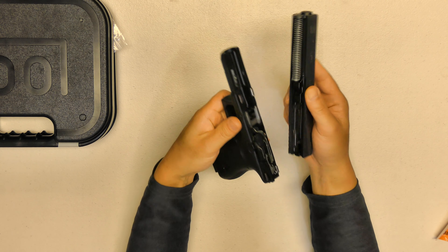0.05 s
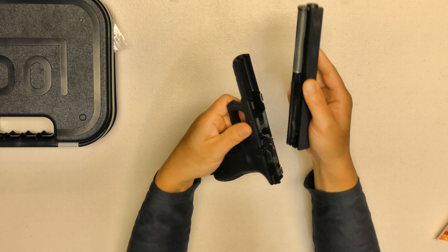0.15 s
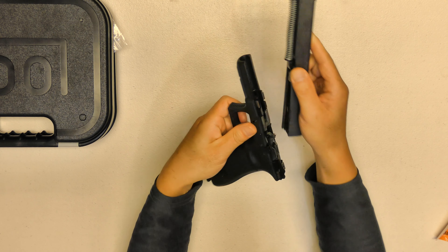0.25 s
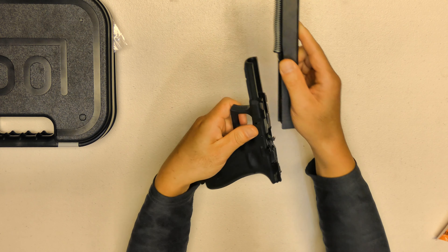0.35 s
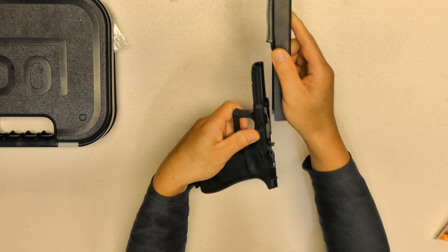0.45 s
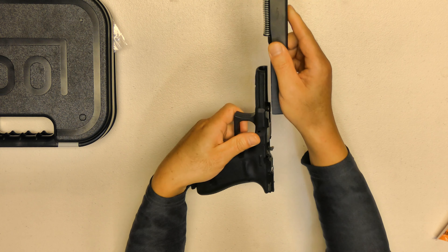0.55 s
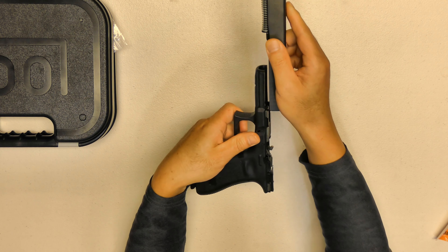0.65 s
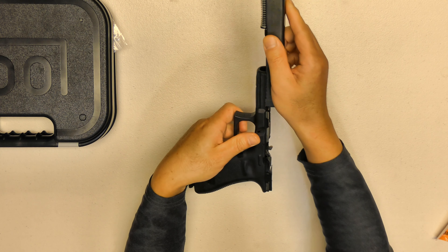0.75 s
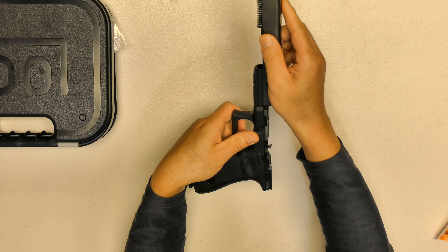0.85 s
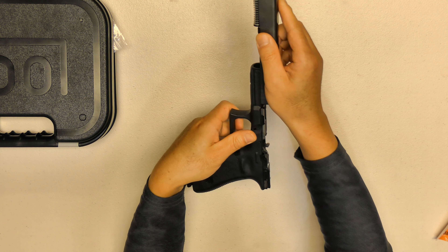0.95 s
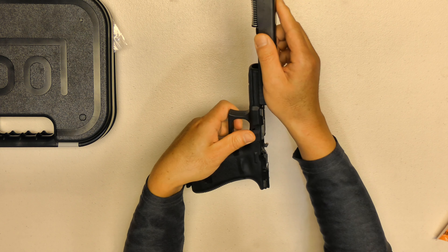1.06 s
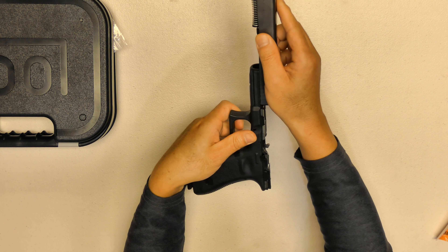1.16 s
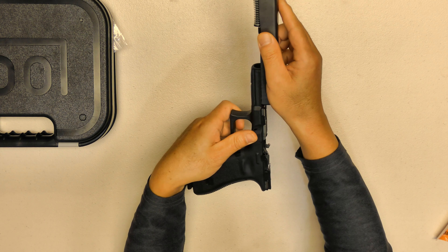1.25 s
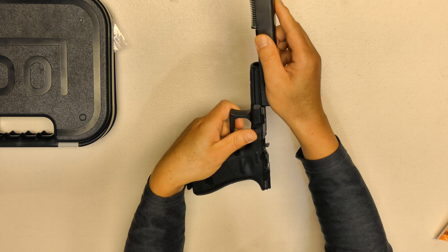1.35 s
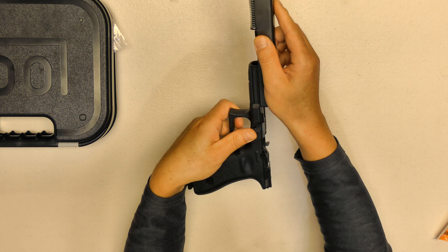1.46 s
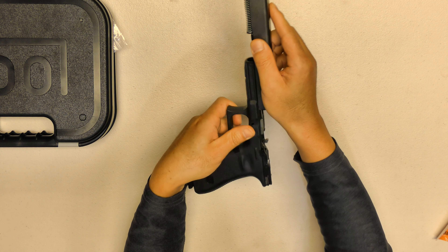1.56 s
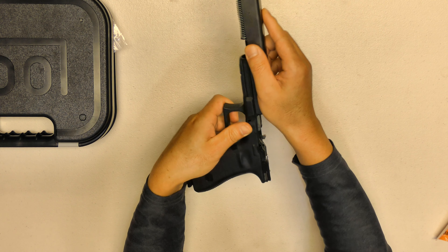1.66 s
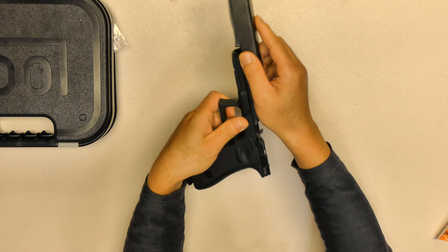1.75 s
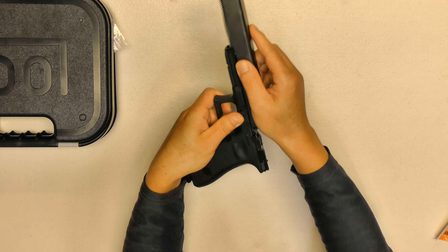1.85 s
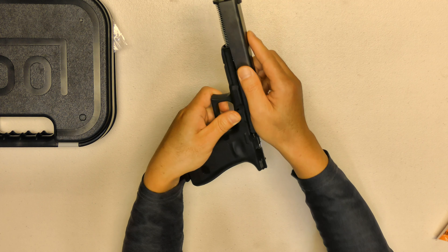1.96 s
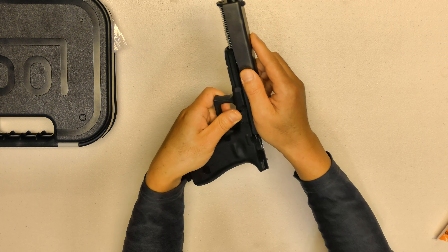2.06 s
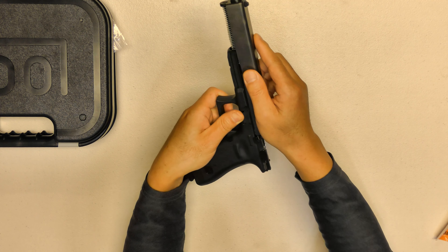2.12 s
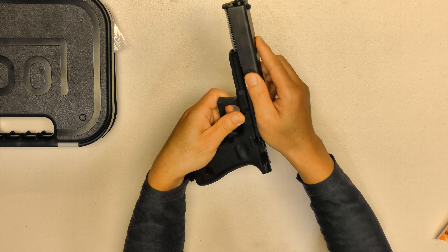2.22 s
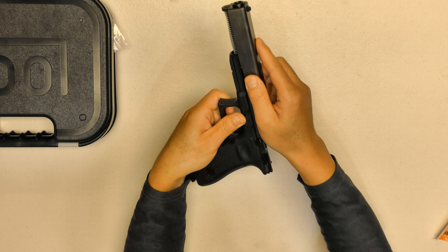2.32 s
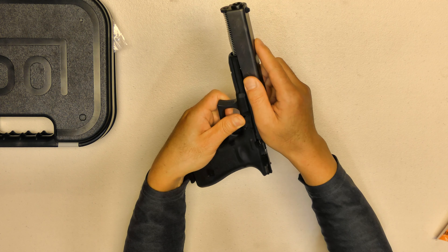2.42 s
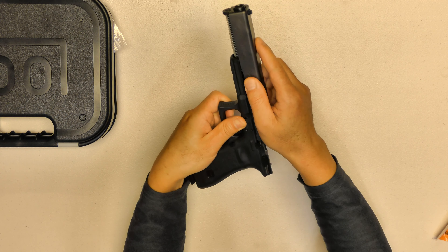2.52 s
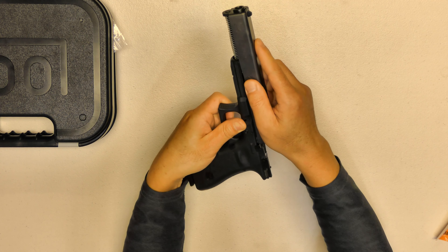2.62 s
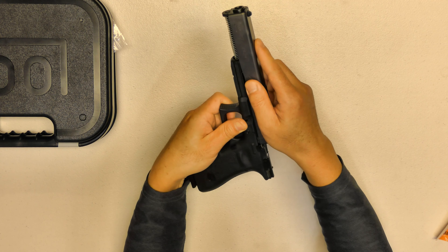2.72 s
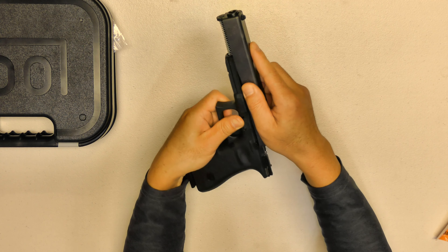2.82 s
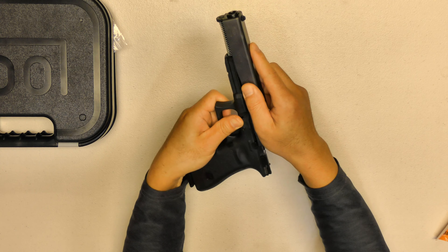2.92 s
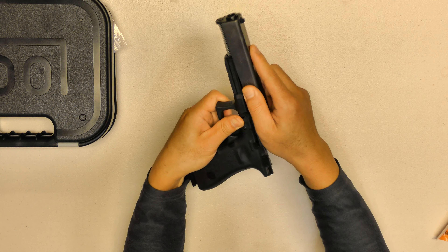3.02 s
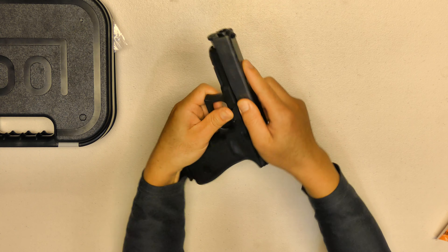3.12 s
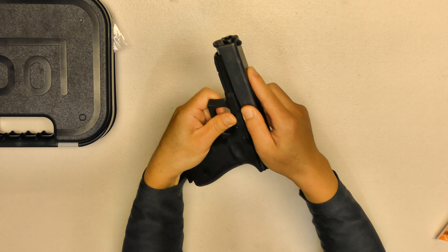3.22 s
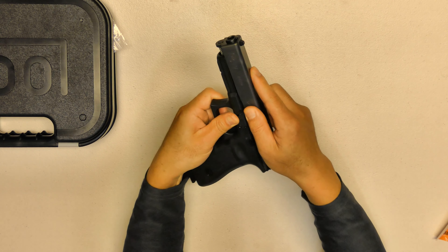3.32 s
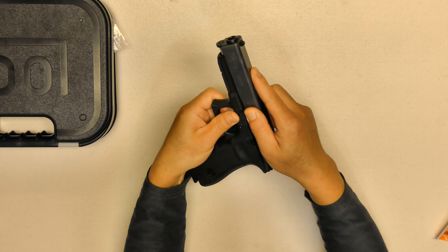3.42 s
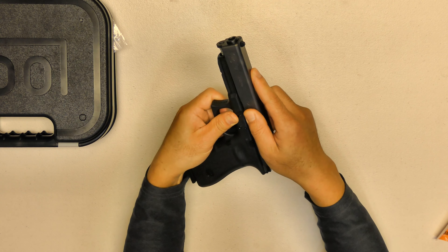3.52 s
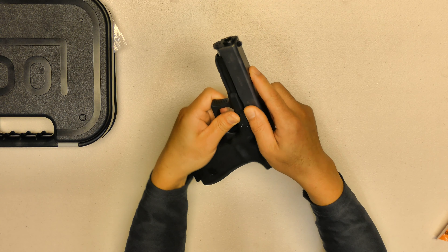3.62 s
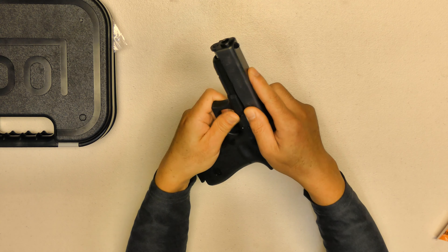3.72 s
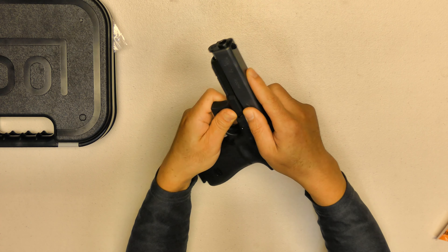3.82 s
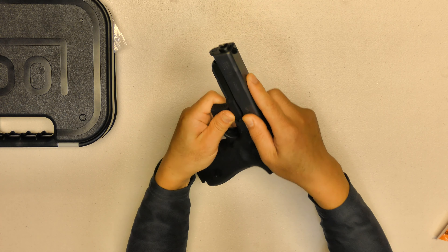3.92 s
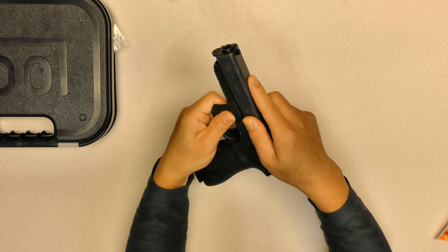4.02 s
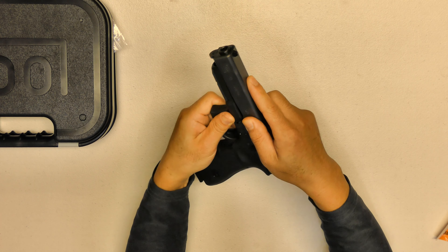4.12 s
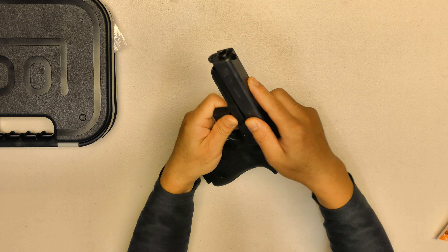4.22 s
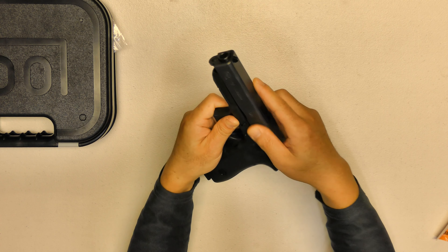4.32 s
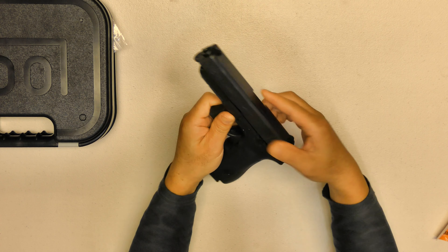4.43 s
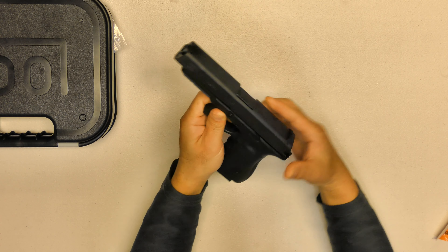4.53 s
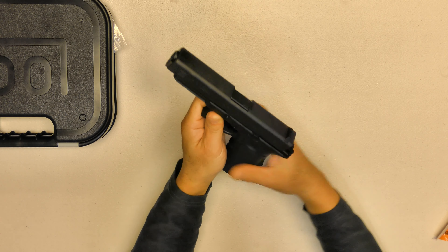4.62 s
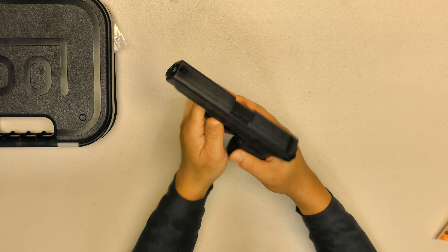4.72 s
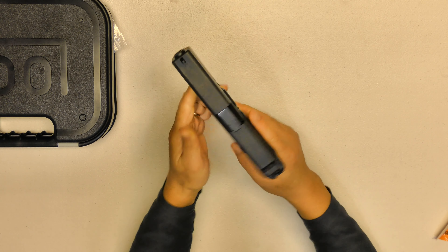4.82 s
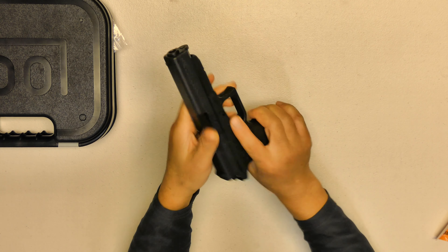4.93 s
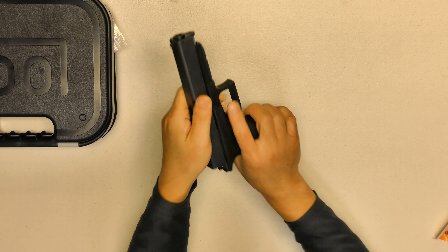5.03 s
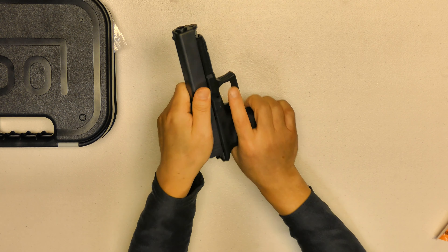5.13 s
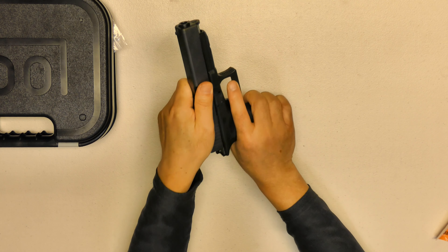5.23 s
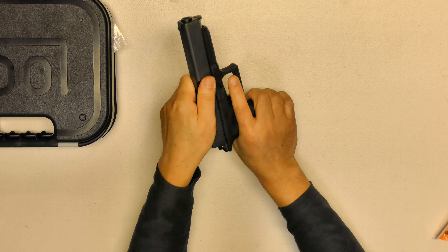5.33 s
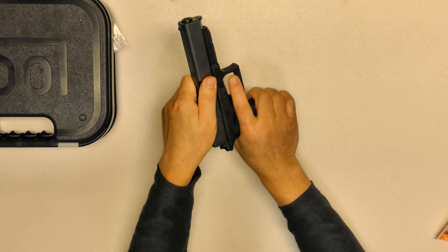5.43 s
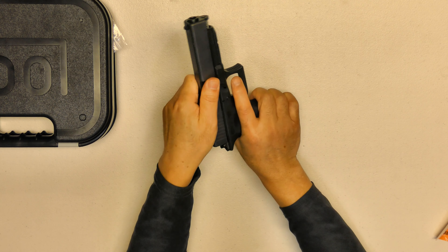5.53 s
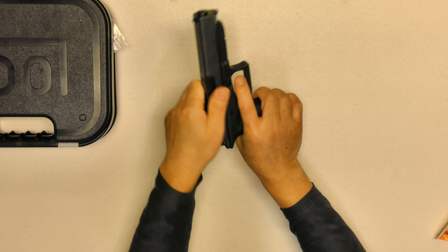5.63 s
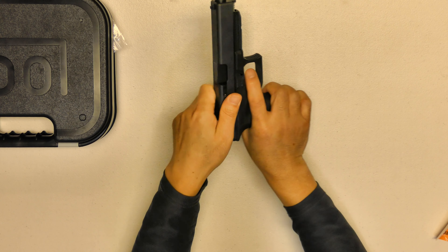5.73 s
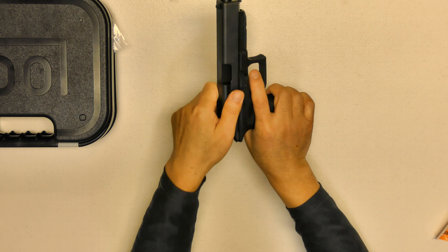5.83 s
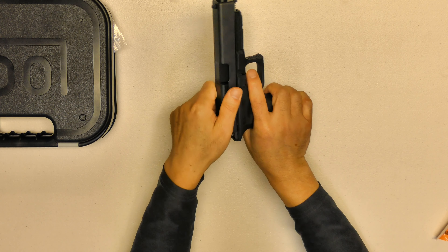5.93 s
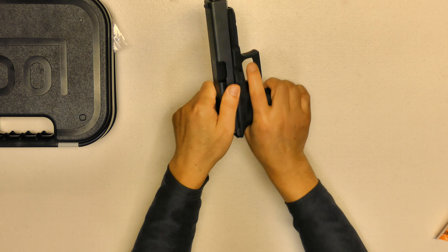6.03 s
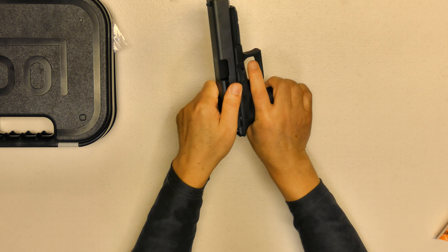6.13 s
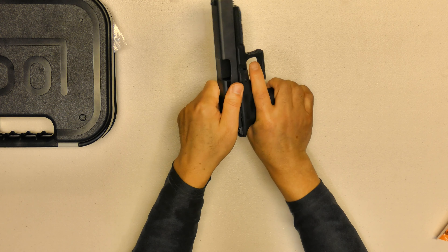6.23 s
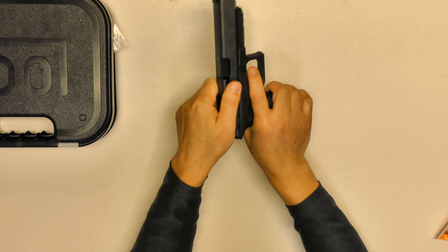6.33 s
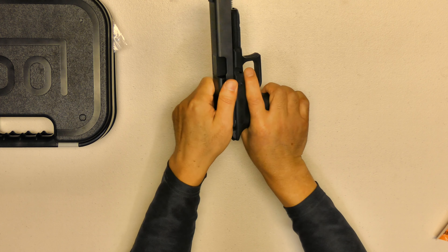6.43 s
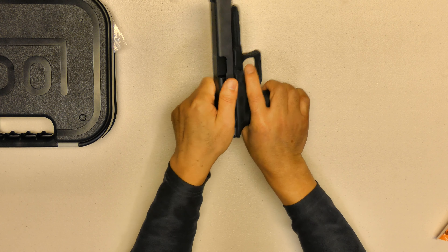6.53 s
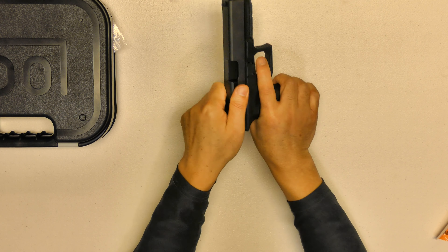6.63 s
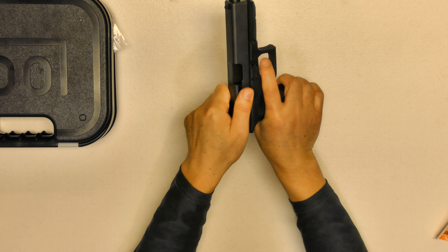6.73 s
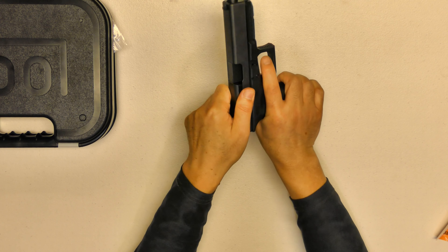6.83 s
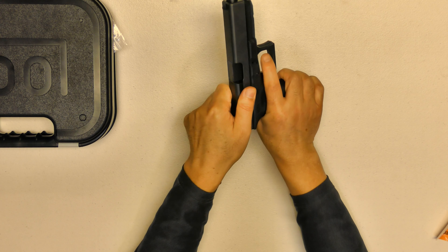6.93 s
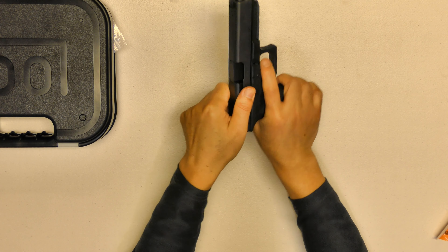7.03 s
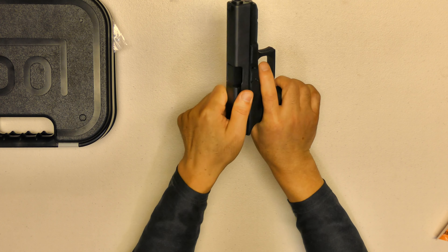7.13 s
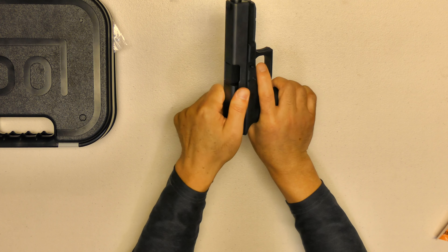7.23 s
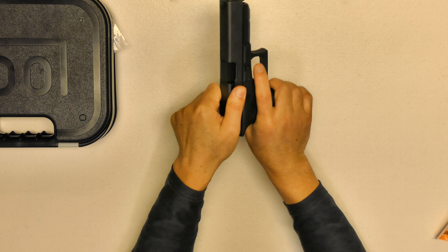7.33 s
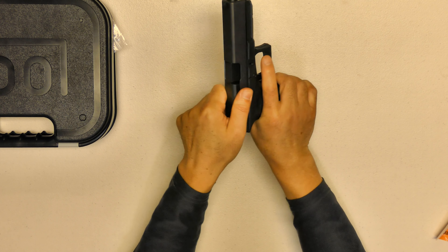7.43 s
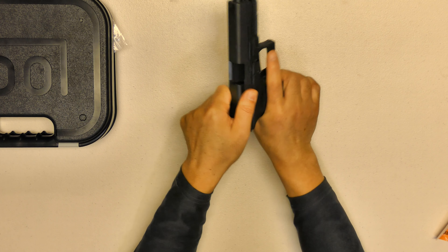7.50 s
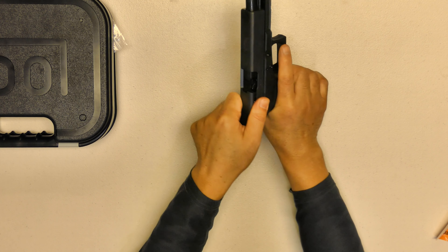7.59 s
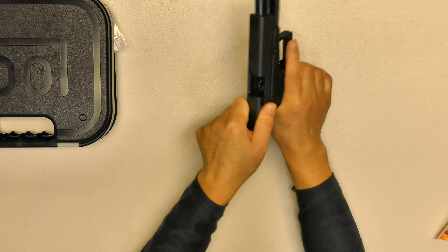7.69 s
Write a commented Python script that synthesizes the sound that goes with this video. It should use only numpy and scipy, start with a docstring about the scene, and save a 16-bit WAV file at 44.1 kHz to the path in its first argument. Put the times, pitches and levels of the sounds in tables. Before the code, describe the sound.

In a bare room, a pistol is put together by hand over a table, close to the microphone. Light metallic clicks and short scrapes come as the slide meets the frame, then a loud ringing clack as it is pushed home. After a quieter stretch of faint ticks and finger rubs, the slide is racked with a cluster of clacks and a final, loudest snap. Each clack rings briefly in the room.

```python
"""In a bare room, over a table, a pistol slide is set on its frame, pushed along the rails, then racked.
Steel parts knock together and ring in quick clacks, and the rails scrape in many tiny slips.
Arms shake the table into soft thuds, fingers rub the grip, and a faint hush fills the background.
The room rings after every clack; an automatic volume control ducks the loud ones and lets their tails swell.
"""
import sys
import numpy as np
from scipy import signal
from scipy.fft import rfft, irfft
from scipy.io import wavfile
from scipy.ndimage import uniform_filter1d, minimum_filter1d

SR = 44100
rng = np.random.default_rng(int(sys.argv[2]) if len(sys.argv) > 2 else 0)


def dump_mix(stems):
    """Bounce the given channels to the path in sys.argv[1] as a 16-bit WAV at rate SR."""
    frames = np.atleast_2d(stems).T  # one column per channel
    limited = np.clip(frames, -1, 1)  # hard clip at full scale
    pcm = np.round(limited * 32767).astype(np.int16)
    wavfile.write(sys.argv[1], SR, pcm)


N = 342216
TIME = np.arange(N) / SR

# The tone of steel touching steel. Each row: frequency in Hz, level in dB.
CONTACT_TONE = [(40, -25.5), (200, -25.5), (450, -16.5), (660, -18.5), (820, -18), (1050, -11.5),
                (1500, -9.5), (1900, -3.5), (3500, -6), (4700, -11), (10500, -11), (13000, -14),
                (16000, -20)]
# The notes at which slide and frame ring. Each row: pitch in Hz, width in Hz, boost in dB.
STEEL_NOTES = [(1374, 47, 4), (1925, 42, -1.5), (2340, 110, -0.5), (3035, 43, 3), (3730, 480, 4)]


def amp(db):
    """Turn decibels into a plain multiplier."""
    return 10 ** (np.asarray(db) / 20)


def unit_level(x):
    """Scale a sound to an average power of one."""
    return x / np.sqrt(np.mean(x ** 2) + 1e-20)


def at_pitch(points, hz):
    """Read a curve of (frequency, value) points at the frequencies hz."""
    f, value = np.transpose(points)
    return np.interp(np.log(hz + 1), np.log(f + 1), value)


def add(mix, start_s, sound):
    """Mix a sound in at its start time."""
    part = mix[max(round(start_s * SR), 0):][:len(sound)]
    part += sound[:len(part)]


def bins(size=4096):
    """The frequencies in the spectrum of a sound that is size samples long."""
    return np.fft.rfftfreq(size, 1 / SR)


def boosts(notes, hz):
    """The dB that a set of ringing notes adds at each frequency."""
    return sum(db / (1 + (2 * (hz - f) / width) ** 2) for f, width, db in notes)


def colour(x, db):
    """Shape the tone by a dB curve, so that notes ring after a blow and never before."""
    log_gain = np.log(amp(np.r_[db, db[-2:0:-1]]))
    response = np.fft.ifft(np.exp(np.conj(signal.hilbert(log_gain)))).real
    return signal.fftconvolve(x, response[:len(db)])[:len(x)]


def treble(hz, hardness_db=0, corner_hz=5500, soft_below_db=-13, dulling=.5):
    """The share, 0 to 1, of each frequency that only a hard knock reaches; the softest stop lower."""
    corner = corner_hz * amp(dulling * min(hardness_db - soft_below_db, 0))
    return 1 / (1 + (corner / (hz + 1)) ** 7)


def stereo(a, b, likeness):
    """Blend two unrelated sounds into left and right; a likeness of 1 makes both sides equal."""
    mid, side = a * np.sqrt((1 + likeness) / 2), b * np.sqrt((1 - likeness) / 2)
    return np.array([mid + side, mid - side])


def tiny_slips(per_s, spread_db):
    """Rubbing surfaces slip by uneven amounts at random moments."""
    size = amp(spread_db * np.minimum(rng.exponential(1, N), 4))
    return unit_level(rng.standard_normal(N) * size * (rng.random(N) < per_s / SR))


def resonate(x, hz, width_hz):
    """Make a sound ring at a pitch that follows the curve hz."""
    turn = np.exp(2j * np.pi * np.cumsum(hz) / SR)
    decay = np.exp(-np.pi * width_hz / SR)
    return unit_level((turn * signal.lfilter([1], np.poly([decay, decay]), x / turn)).real)


def stroke(length, attack_s, release_s, swell_db=0):
    """The strength of one hand movement: it sets in, holds, swells or fades, then dies away."""
    t = np.arange(0, length + 8 * release_s, 1 / SR)
    held = amp(swell_db * (np.minimum(t / length, 1) - .5))
    return np.minimum(t / attack_s, 1) * held * np.exp(-np.maximum(t - length, 0) / release_s)


def strokes(rows, attack_s, release_s):
    """The strength of a series of hand movements at every sample."""
    out = np.zeros(N)
    for start, length, db in rows:
        add(out, start, amp(db) * stroke(length, attack_s, release_s))
    return out


def background_hush(level_db=-63):
    """Room noise and microphone hiss, hollow in the low middle and gently wavering."""
    # The tone of the hush. Each row: frequency in Hz, level in dB.
    tone = [(25, -9.5), (116, 1.5), (390, -6), (600, -20), (760, -12), (1000, -9.5), (1900, -13),
            (2600, -12.5), (4000, -20), (6500, -29.5), (11500, -22), (15800, -24)]
    # A faint fan-like whirr. Each row: pitch in Hz, width in Hz, boost in dB.
    whirr = [(1790, 220, 8.5), (2240, 130, 5.5)]
    # How the hush wavers. Each row: time in seconds, change of level in dB.
    waver = [(1.3, 2.5), (2.0, 3.5), (2.4, -1.5), (2.68, -1), (3.1, 3.5), (5.9, 2)]
    # How alike left and right are. Each row: frequency in Hz, likeness from 0 to 1.
    likeness = [(380, 0.27), (2380, 0.23), (15000, 0.66)]
    hz = bins(N)
    spectrum = stereo(*rfft(rng.standard_normal((2, N))), at_pitch(likeness, hz))
    hush = unit_level(irfft(spectrum * amp(at_pitch(tone, hz) + boosts(whirr, hz)), N))
    return amp(level_db + np.interp(TIME, *np.transpose(waver))) * hush


def clacks(struck_db, striker_db, width_hz, smear_ms=0, rattle_db=-23, rattle_s=0.024, size=4096):
    """Each knock chatters for a moment and rings the steel; the two parts that meet sing loudest."""
    # Metal knocks. Each row: start in seconds, level in dB, treble in dB, chatter time in milliseconds,
    # pitch of the struck part in Hz, pitch of the striking part in Hz.
    knocks = [ (0.347, -52, -14, 0.64, 2400, 3600), (0.711, -42, -20.5, 1.3, 1980, 3780),
              (.852, -33, -12.5, 0.76, 3180, 1900), (.997, -41, -21.5, 1.1, 2150, 3700),
              (1.297, -44.5, -21, 1.1, 2320, 2860), (1.425, -24, -14, 0.97, 2150, 3200),
              (1.569, -22.5, -18, 0.75, 1900, 3440), (1.576, -24.5, -11, 2.5, 2310, 3300),
              (1.681, -29, -15, 5.6, 2520, 2320), (1.940, -41, -10, 0.4, 2250, 8100),
              (2.027, -27, 0.5, 0.8, 4750, 3720), (2.029, -23.5, -1.5, 1.25, 2080, 1680),
              (2.044, -21.5, -10, 3, 2240, 2940), (2.728, -32.5, -19, 1.44, 2100, 1330),
              (2.915, -30.5, -3, 1.6, 2220, 3800), (3.173, -38, 7.5, 0.64, 2200, 3400),
              (3.185, -24.5, 0, 1.2, 3400, 2050), (3.195, -7.5, -4.5, 2.5, 2090, 2300),
              (3.213, -17, -13, 3.9, 1930, 3746), (3.2233, -5.5, 3.5, 1.7, 2100, 2780),
              (4.536, -52, -16.5, 0.85, 2390, 3300), (4.576, -47.5, -21, .9, 2370, 3400),
              (4.701, -47.5, -21, 1.26, 1930, 3200), (4.863, -44.5, -16.5, 2.6, 1720, 2300),
              (4.938, -45, -12, 0.65, 4370, 2280), (5.24, -44.5, -17.5, 8, 1930, 3240),
              (6.408, -41, -16, 3, 2020, 1400), (6.624, -36.5, -19, 0.68, 3320, 2700),
              (6.644, -40, 0.5, 1.1, 3450, 2700), (6.6681, -14, -2, 1.3, 3370, 2010),
              (6.6745, -17.5, -14, 1.3, 3340, 970), (6.681, -21, 3, 1.3, 1100, 8900),
              (6.6943, -16, -4.5, 0.94, 3280, 1730), (6.699, -19, 3, 1.43, 2160, 3700),
              (7.387, -40.5, -1, 1.9, 3190, 1200), (7.475, -31, 2, 0.97, 3600, 7500),
              (7.4817, -23.5, 1, 1.95, 3030, 2020), (7.608, -27.5, -8, 1, 1430, 3220),
              (7.614, 4, 11.5, 0.56, 3290, 10670), (7.636, -6, 7, 4, 3700, 1760)]
    # How much the parts sing at each knock level; light and loud knocks sing alike. Each row: knock level in
    # dB, share of their boost.
    singing = [(-48, 1), (-28, 1)]
    # The open frame rings hollow. Each row: pitch in Hz, width in Hz, boost in dB when fully open.
    hollow = [(650, 130, 14), (4700, 600, 8)]
    # The slide slowly covers the frame. Each row: time in seconds, share left open from 0 to 1.
    opening = [(1.6, 0.66), (2.4, 0)]
    hz, t, out = bins(), np.arange(size) / SR, np.zeros(N)
    steel_db = at_pitch(CONTACT_TONE, hz) + boosts(STEEL_NOTES, hz)
    for start, db, treble_db, chatter_ms, struck_hz, striker_hz in knocks:
        age = t * 1000 / (chatter_ms + smear_ms)
        blow = age * np.exp(-(age / 2) ** 2)
        loose_rattle = amp(rattle_db) * np.tanh(age) * np.exp(-t / rattle_s)
        force = np.sqrt(blow + loose_rattle)
        # many tiny hits in one blow reach all frequencies about equally
        phases = np.angle(rfft(rng.standard_normal(size) * force))
        chatter = force * irfft(np.exp(1j * phases))
        parts = [(struck_hz, width_hz, struck_db), (striker_hz, width_hz, striker_db)]
        parts_db = np.interp(db, *np.transpose(singing)) * boosts(parts, hz)
        hollow_db = np.interp(start, *np.transpose(opening)) * boosts(hollow, hz)
        ring = colour(chatter, steel_db + parts_db + hollow_db)
        ring *= np.sqrt(0.0026 * SR / np.sum(ring ** 2))  # equal energy before level and treble are set
        add(out, start, amp(db) * colour(ring, treble_db * treble(hz, treble_db)))
    return out


def table_echo(x, spread_s=0.00037):
    """Sound bounces off the table and reaches one microphone a little before the other."""
    # The first echo. Each row: delay in seconds, level in dB.
    bounces = [(.0042, -9.5)]
    out = np.zeros((2, N))
    for delay, db in bounces:
        for channel in out:
            add(channel, delay + spread_s * rng.random(), amp(db) * x)
    return out


def room_ring(x, likeness, build_s):
    """Echoes from the bare room build up quickly, then the highs die away before the lows."""
    # How long the room rings. Each row: frequency in Hz, seconds to fade by 60 dB.
    fade_times = [(2000, 0.78), (5000, 0.7), (9700, 0.54), (15000, 0.32)]
    # The tone of the room. Each row: frequency in Hz, level in dB.
    tone = [(100, 6.5), (380, 0.5), (640, -3), (830, -9), (1400, -4), (5000, -1.65), (15000, -4)]
    build_up = 1 - np.exp(-(TIME[:SR] / build_s) ** 2)
    echoes = stereo(*rng.standard_normal((2, SR)), likeness) * build_up
    hz, seconds, bands = signal.stft(echoes, SR, nperseg=512)
    bands = bands * amp(-60 * seconds / at_pitch(fade_times, hz)[:, None])
    strength = np.linalg.norm(signal.istft(bands, SR, nperseg=512)[1][0])
    tail = signal.istft(bands * amp(at_pitch(tone, hz))[:, None], SR, nperseg=512)[1] / strength
    return signal.fftconvolve(x[None], tail, axes=1)[:, :N]


def rail_scrapes(sing_db=-1.5, width_hz=350, overtone=1.66, overtone_db=-8, full_song_s=0.091):
    """Slips on the rails ring the steel, and two bending notes that glide as the slide travels."""
    # Strokes of the slide. Each row: start in seconds, length in seconds, level in dB, swell in dB,
    # treble in dB, pitch of the rail at mid-stroke in Hz, fall of that pitch in octaves.
    scrapes = [ (1.394, 0.032, -58.5, 5, -25, 3120, 0.09), (1.663, 0.22, -59, -10, -11, 2460, 0.42),
               (1.858, 0.18, -54, 12.5, -7.5, 2130, 0.077), (2.891, 0.034, -45.5, 3.5, -13, 2180, 0.14),
               (3.127, 0.043, -52.5, 20, -12, 2100, 0.082), (3.169, 0.052, -29, 18, -2, 2020, 0.096),
               (6.644, 0.031, -41, 0.5, -10.5, 3040, 0), (6.682, 0.14, -51, 3, 4, 2650, 0.81),
               (7.48, 0.11, -54, -20, -14.5, 2500, 0.42)]
    hz, out = bins(), np.zeros(N)
    slips = tiny_slips(per_s=8000, spread_db=3.0)
    steel = unit_level(colour(slips, at_pitch(CONTACT_TONE, hz) + boosts(STEEL_NOTES, hz)))
    highs = irfft(rfft(steel) * treble(bins(N)), N)
    for start, length, db, swell_db, treble_db, rail_hz, fall in scrapes:
        force = amp(db) * stroke(length, attack_s=0.0091, release_s=0.022, swell_db=swell_db)
        now = (round(start * SR) + np.arange(len(force))) % N
        travel = np.minimum(TIME[:len(force)] / length, 1)
        glide_hz = rail_hz * 2 ** (-fall * (travel - .5))
        song = resonate(slips[now], glide_hz, width_hz)
        song += amp(overtone_db) * resonate(slips[now], overtone * glide_hz, width_hz)
        song *= min(length / full_song_s, 1) ** 2  # short strokes sing less
        scrape = steel[now] + (amp(treble_db) - 1) * highs[now]
        add(out, start, force * (scrape + amp(sing_db) * song))
    return out


def ringing_parts():
    """Barrel, spring and slide each hold their own note for a moment when a blow lets go of them."""
    # Parts left free to ring. Each row: start in seconds, pitch in Hz, level in dB,
    # seconds to fade by 60 dB.
    notes = [(1.424, 4770, -46, .07), (2.729, 1337, -54, 0.32), (3.195, 2004, -10.5, 0.033),
             (3.1945, 2320, -9.5, 0.041), (4.937, 4280, -51, 0.036), (7.483, 3036, -27, .05)]
    t, out = TIME[:SR // 2], np.zeros(N)
    for start, hz, db, fade_s in notes:
        onset = 1 - np.exp(-(hz * t / 2) ** 2)  # builds up over two cycles
        add(out, start, onset * amp(db - 60 * t / fade_s) * np.sin(2 * np.pi * hz * t))
    return out


def table_thuds(likeness=0.63, hum_db=-4):
    """Arms shake the table: its low notes hum over a rumble that differs between left and right."""
    # Pushes of the arms. Each row: start in seconds, length in seconds, level in dB.
    pushes = [(1.5, 0.93, -71.5), (2.9, 0.07, -64), (3.21, 0.16, -59.5), (3.5, 0.49, -68),
              (4.8, 0.56, -69.5), (6.4, 0.032, -57), (6.68, 0.11, -45), (7.48, 0.32, -51)]
    # The dull tone of wood. Each row: frequency in Hz, level in dB.
    wood = [(20, -18), (60, -6.5), (300, -1.5), (500, -14), (900, -33), (3000, -76)]
    # The table's own notes. Each row: pitch in Hz, width in Hz, boost in dB.
    notes = [(53.6, 13, 14.5), (122.6, 11, 18.5), (178.1, 19, 12)]
    hz = bins(size=32768)
    tone_db = at_pitch(wood, hz) + boosts(notes, hz)
    rumbles = [unit_level(colour(noise, tone_db)) for noise in rng.standard_normal((2, N))]
    hum = unit_level(sum(amp(db) * np.sin(2 * np.pi * (f * TIME + rng.random())) for f, _, db in notes))
    force = strokes(pushes, attack_s=0.06, release_s=0.076)
    return force * (stereo(*rumbles, likeness) + amp(hum_db) * hum)


def finger_rubs():
    """Skin slips over the grip in tiny steps that blur into a hiss."""
    # Rubs of the fingers. Each row: start in seconds, length in seconds, level in dB.
    rubs = [(4.74, 0.069, -58.5), (4.9, 0.4, -70), (5.69, 0.1, -68), (6.425, 0.024, -55),
            (7.37, 0.046, -47.5)]
    # The tone of rubbing skin. Each row: frequency in Hz, level in dB.
    tone = [(100, -9), (700, -12), (2000, 5.5), (5000, -6), (10000, -4.5), (16000, -8)]
    hiss = unit_level(colour(tiny_slips(per_s=6000, spread_db=-1.5), at_pitch(tone, bins())))
    return strokes(rubs, attack_s=0.039, release_s=0.044) * hiss


def scene():
    """The microphones face one side of the pistol; the room gathers the sound from all its sides."""
    # How the sound leans to one side. Each row: frequency in Hz, left minus right in dB.
    lean = [(120, 1), (450, -2), (8000, 0)]
    sliding = rail_scrapes() + finger_rubs()
    ringing = ringing_parts()
    facing = clacks(struck_db=10, striker_db=7.5, width_hz=260) + ringing
    all_round = clacks(struck_db=5, striker_db=3.5, width_hz=400, smear_ms=1.5) + .5 * ringing
    reflected = table_echo(facing) + room_ring(all_round + sliding, likeness=0.7, build_s=0.00091)
    mix = facing + sliding + reflected + table_thuds() + background_hush()
    lean_db = at_pitch(lean, bins(N)) / 2
    return irfft(rfft(mix) * amp([lean_db, -lean_db]), N)


def record(dry, threshold_db=-24.0, recover_db_per_s=85, squeeze=.85, ceiling=.85, top_hz=16000):
    """The volume drops fast on loud clacks and recovers in their tails; peaks and top treble are cut."""
    meter, attack = np.exp(-1 / (np.array([.007, .002]) * SR))  # smoothing over 7 ms and 2 ms
    power_db = 10 * np.log10(signal.lfilter([1 - meter], [1, -meter], (dry ** 2).mean(0)) + 1e-12)
    fall_db = TIME * recover_db_per_s
    held_db = np.maximum.accumulate(power_db + fall_db) - fall_db  # jumps up, then sinks steadily
    over_db = np.maximum(held_db - threshold_db, 0)
    ducked = dry * amp(-squeeze * signal.lfilter([1 - attack], [1, -attack], over_db))
    peak_gain = ceiling / np.maximum(abs(ducked).max(0), ceiling)
    limited = ducked * uniform_filter1d(minimum_filter1d(peak_gain, size=33), size=33)
    low_pass = signal.firwin(255, top_hz, window=("kaiser", 9), fs=SR)
    return signal.oaconvolve(limited, low_pass[None], "same")


dry = scene()
out = record(dry)
dump_mix(out)
```